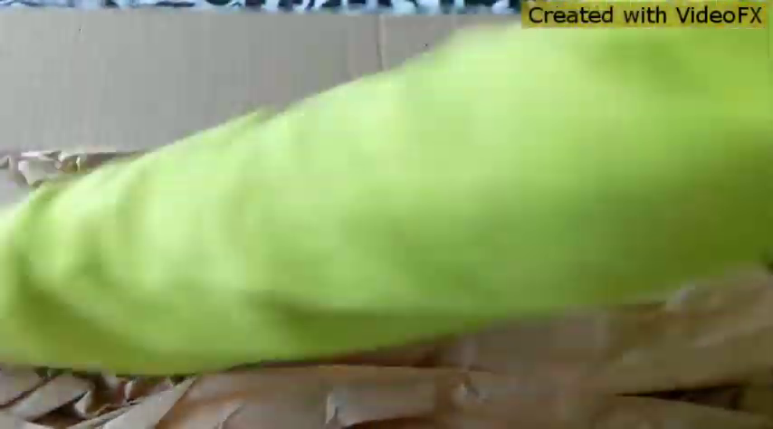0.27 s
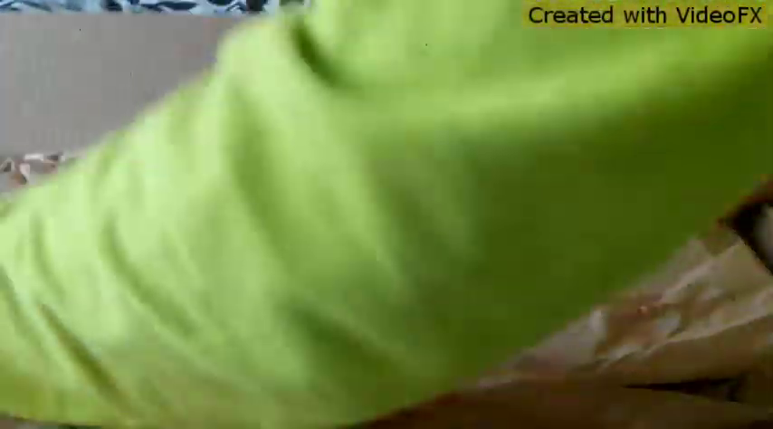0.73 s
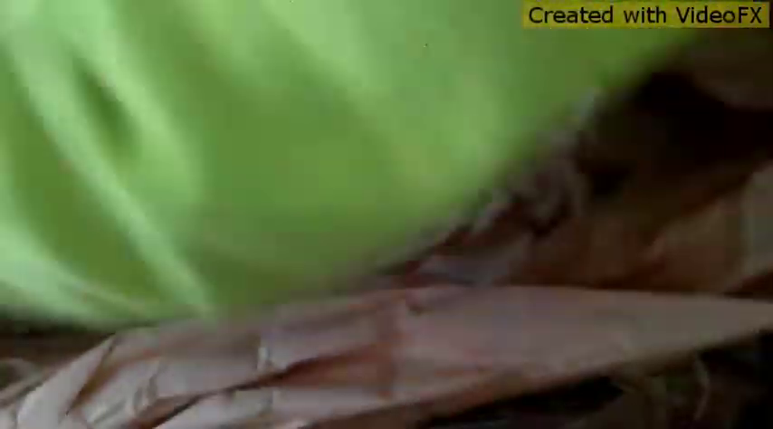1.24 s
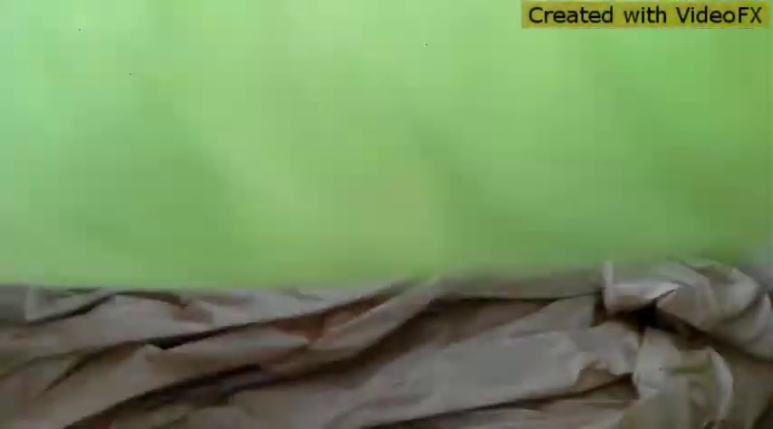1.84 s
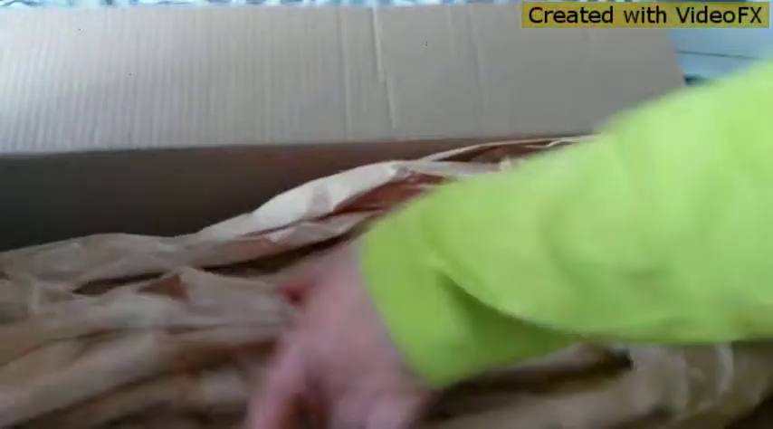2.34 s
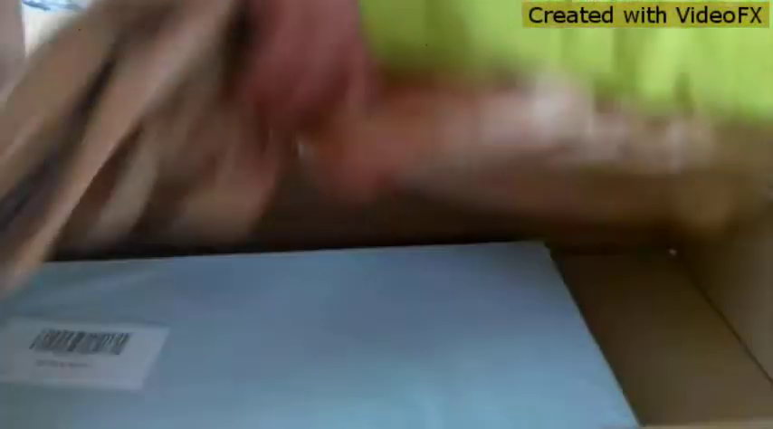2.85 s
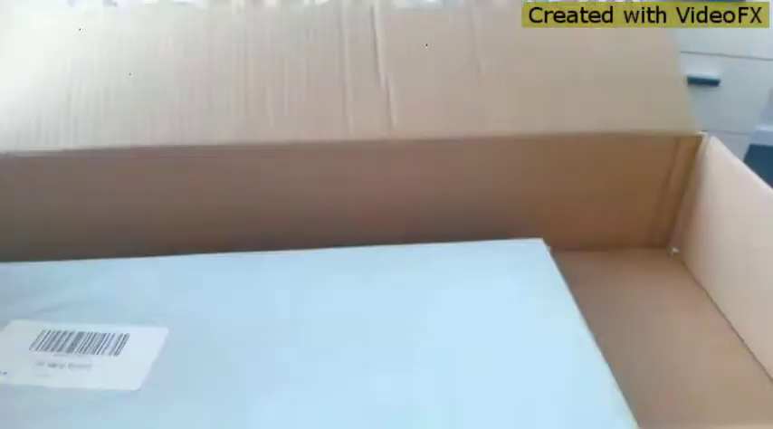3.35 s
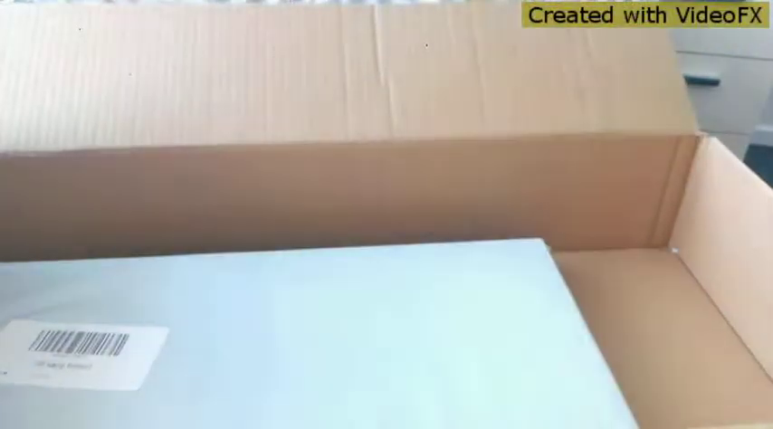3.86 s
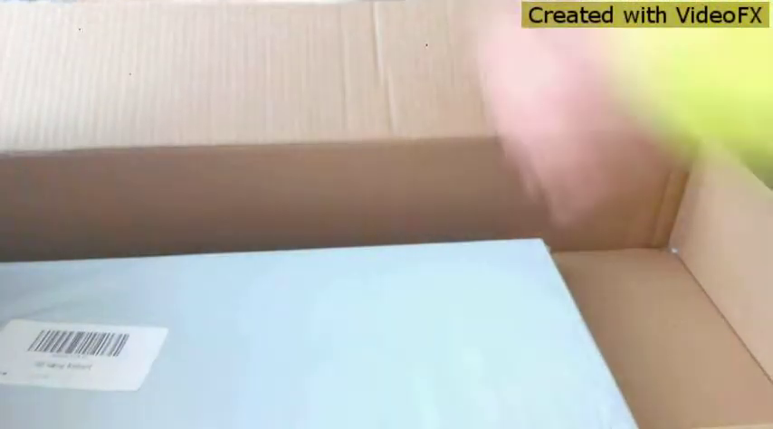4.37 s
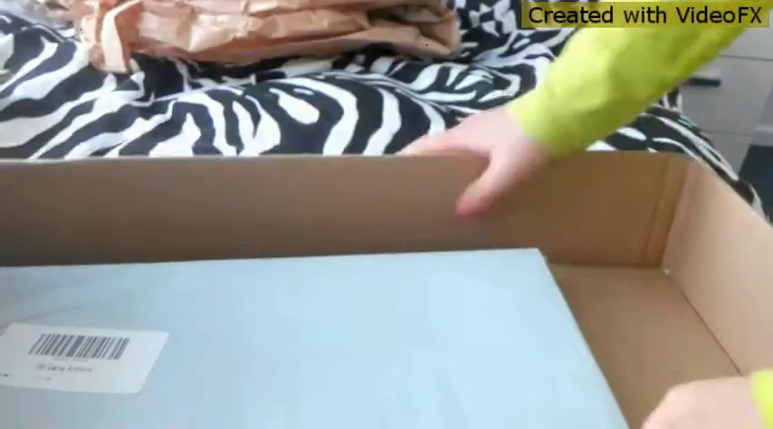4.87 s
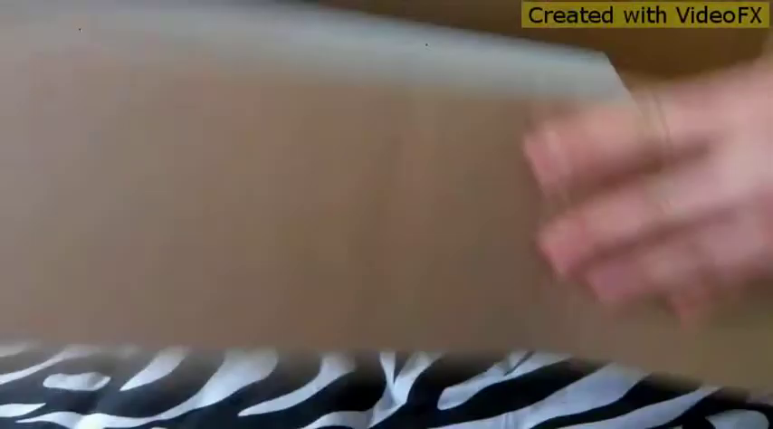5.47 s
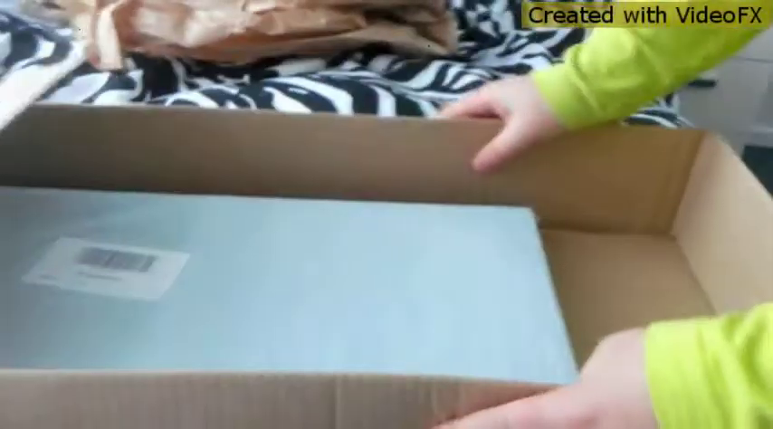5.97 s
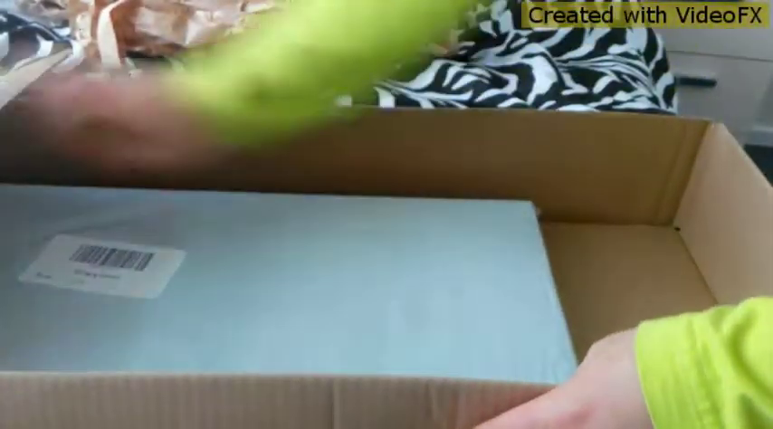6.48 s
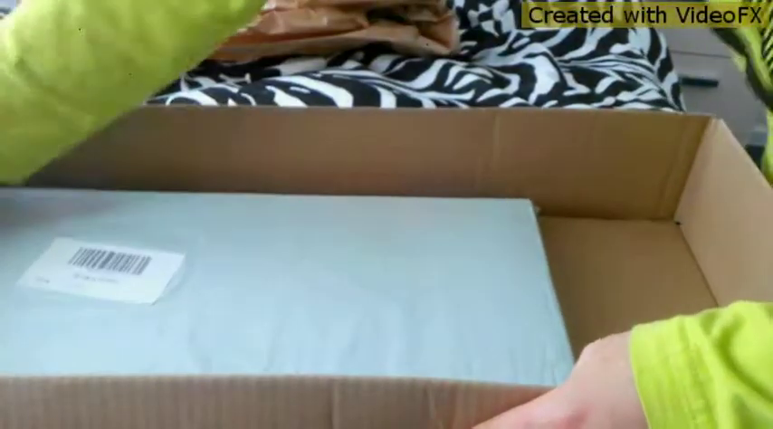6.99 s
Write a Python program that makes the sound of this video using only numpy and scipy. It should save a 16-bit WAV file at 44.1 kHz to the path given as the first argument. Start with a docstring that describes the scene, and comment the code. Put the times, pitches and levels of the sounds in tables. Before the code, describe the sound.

A close, slightly muffled perspective over an open cardboard box in a dry furnished room with a very faint floor of room tone. Gentle paper crinkles begin at once, with a low hollow bump and a snap near 0.55 s. From 0.85 to 2.2 s, stiff paper rustles in uneven strokes, with clusters of crisp snaps around 1.0-1.2 s and a soft thud at 2.25 s. The loudest crackling comes from 2.4 to 3.1 s, dense and bright, as the paper is pulled out. Softer crinkles and panel knocks follow to 3.6 s, a tiny squeak at 3.7, then light rustles and a short hoarse rub at 4.33. From 4.8 s the box is handled: dull knocks, faint ticks, brief scuffs and a small snap near 5.9. After quiet finger taps around 6.1, a hollow knock lands at 6.65, then a low rub and a final rustle with a bump near 7.2.

```python
"""A furnished room, a small microphone with a dull top just above an open cardboard box.
Crumpled kraft paper is gathered up and pulled out of the box, then put down close by.
Buckling creases are noise in half octaves driven by clumped clicks, over a hiss of sliding sheets; folds
snap as bursts of many decaying sines. Hands knock on the box, tip it and drag it: a swinging panel with
ringing modes, filtered noise for taps and ticks, gliding hoarse tones for rubs."""
import sys
import numpy as np
from scipy import signal
from scipy.fft import rfft, irfft, next_fast_len
from scipy.io import wavfile
from scipy.ndimage import uniform_filter1d

SR = 44100
rng = np.random.default_rng(int(sys.argv[2]) if len(sys.argv) > 2 else 0)


def wav_record(signal):
    """Record a signal, one row per channel, as 16-bit PCM in the file named by sys.argv[1]."""
    frames = np.transpose(np.atleast_2d(signal))
    bounded = np.clip(frames, -1, 1)
    # unit amplitude maps onto the largest positive 16-bit level
    quanta = np.round(bounded * 32767).astype(np.int16)
    wavfile.write(sys.argv[1], SR, quanta)


N = 318402
TIME = np.arange(N) / SR


def from_db(db):
    """Decibels to gain."""
    return 10 ** (np.asarray(db) / 20)


def rms_one(x):
    """Scale to rms 1."""
    return x / np.sqrt(np.mean(x ** 2) + 1e-20)


def drift(rate_hz):
    """Slow chance with spread 1: straight lines between random knots."""
    knots = rng.standard_normal(20000)
    return rms_one(np.interp(TIME * rate_hz, np.arange(len(knots)), knots))


def coloured(x, points):
    """Causal (minimum-phase) filter with a spectrum of (pitch_hz, level_db) points."""
    size = 2 * next_fast_len(N // 2 + SR // 2)
    half = size // 2
    hz, db = np.transpose(points)
    grid_hz = np.maximum(np.arange(half + 1) * SR / size, 1)
    gain = from_db(np.interp(np.log(grid_hz), np.log(hz), db))
    # folding the cepstrum onto positive times makes the filter minimum-phase
    cepstrum = irfft(np.log(gain))
    cepstrum[1:half] *= 2
    cepstrum[half + 1:] = 0
    response = np.exp(rfft(cepstrum))
    return irfft(rfft(x, size) * response)[:N]


def resonance(x, hz, width_hz):
    """Two-pole band-pass with gain 1 on top."""
    r = np.exp(-np.pi * width_hz / SR)
    zeros = np.array([1, 0, -1]) * (1 - r * r) / 2
    poles = [1, -2 * r * np.cos(2 * np.pi * hz / SR), r * r]
    return signal.lfilter(zeros, poles, x + 1e-18)


def fading(clicks, seconds):
    """Every click jumps up and dies away exponentially."""
    return signal.lfilter([1], [1, -np.exp(-1 / (seconds * SR))], clicks + 1e-18)


def add(out, s, sound):
    """Mix a sound in from time s."""
    start = max(round(s * SR), 0)
    out[start:start + len(sound)] += sound[:N - start]


def half_octaves():
    """Centre and band-pass of each half octave."""
    edges_hz = np.geomspace(62, 16000, 17)
    for low, high in zip(edges_hz, edges_hz[1:]):
        yield np.sqrt(low * high), signal.butter(2, [low, high], "band", fs=SR, output="sos")


def blend(hz, centres_hz, levels):
    """Level at a pitch, interpolated between register levels over log frequency."""
    weights = [np.interp(np.log(hz), np.log(centres_hz), w) for w in np.eye(len(levels))]
    return sum(w * level for w, level in zip(weights, levels))


# pushes and pulls of the hands on paper and box: start_s, swell_s, hold_s, level_db (700-2500 Hz);
# against that level: body_db (150-700 Hz), crisp_db (2500-7500 Hz), sizzle_db (above 11 kHz)
HAND_STROKES = [(-0.01, 0.03, 0.021, -51, -8.5, -8, -27), (0.044, 0.053, 0.006, -51, -10.5, -3.5, -37),
                (0.162, 0.047, 0.12, -75.5, 1, -3, -35), (0.432, 0.012, 0.045, -55, -8, -3, -41),
                (0.517, 0.012, 0.0066, -47.5, -9, -5.5, -26), (0.837, 0.025, 0.03, -53, -8, -7, -36),
                (0.886, 0.017, 0.035, -64, -8.5, 2.5, -40), (0.95, 0.083, 0.058, -43, -5, -2, -29),
                (1.103, 0.058, 0.13, -44.5, -9.5, -2, -29), (1.34, 0.034, 0.012, -53.5, 1, -2, -42),
                (1.426, 0.054, 0.065, -63, 1.5, -7, -36), (1.515, 0.0033, 0.015, -51.5, -5, -8.5, -47),
                (1.575, 0.11, 0.026, -45.5, -9.5, -2, -37), (1.712, 0.044, 0.078, -47, -8.5, -3, -36),
                (1.834, 0.071, 0.085, -49.5, -8.5, -2, -29.5), (2.003, 0.075, 0.091, -47.5, -13, -5, -42),
                (2.235, 0.032, 0.1, -59, 2.5, -2, -28), (2.421, 0.086, 0.018, -42.5, -7.5, -0.5, -27),
                (2.589, 0.017, 0.011, -40, -4, -4.5, -32), (2.644, 0.0081, 0.16, -41.5, -9.5, -2, -25),
                (2.82, 0.068, 0.097, -44, -5, 0.5, -28), (3.021, 0.035, 0.008, -40, -8.5, 0.5, -18),
                (3.084, 0.028, 0.21, -47.5, -13, 0, -32), (3.323, 0.051, 0.0077, -43, -18, -14, -57),
                (3.376, 0.065, 0.086, -47, -7, 0.5, -27.5), (3.562, 0.064, 0.11, -52, -13, -7, -55),
                (3.77, 0.026, 0.19, -63, -7, -7, -45), (3.958, 0.074, 0.092, -55.5, -14.5, 0, -33),
                (4.113, 0.046, 0.087, -57.5, -9.5, -3, -45), (4.256, 0.08, 0.037, -50, -20, -5, -39),
                (4.402, 0.031, 0.05, -51, 0, -7, -47), (4.461, 0.029, 0.11, -53.5, -11.5, -1.5, -38),
                (4.62, 0.047, 0.57, -75, 0.5, -4, -31), (4.94, 0.01, 0.032, -64, 5.5, -28, -40),
                (5.143, 0.005, 0.18, -58.5, -8, -11, -32), (5.255, 0.052, 0.058, -50.5, -8, -7.5, -25.5),
                (5.408, 0.032, 0.009, -52.5, -3, -8, -32), (5.488, 0.038, 0.008, -57, -19, -3, -35),
                (5.572, 0.013, 0.246, -76, 0.5, -5, -32), (5.776, 0.033, 0.044, -58, 4.5, -13, -34),
                (5.837, 0.034, 0.004, -43, -1.5, -9.5, -39), (5.996, 0.019, 0.72, -81.5, 6, -6, -29.5),
                (6.77, 0.055, 0.01, -73, 4.5, -7.5, -34), (6.977, 0.011, 0.023, -63, 14.5, -20, -37.5),
                (7.026, 0.034, 0.057, -59.5, 2, -14.5, -44), (7.138, 0.087, 0.04, -47, 1, -5.5, -28)]
# brief swells of thin, high paper hiss: centre_s, level_db (above 11 kHz)
HISS_SWELLS = [(.035, -63), (1.26, -70), (2.15, -79), (4.72, -74)]
HISS_S = 0.011  # from the centre until the level has dropped to 1/e
# fall once the hand lets go, the highs fastest: body, middle, crisp, sizzle [dB per s]
RELEASE_DB_PER_S = (184, 228, 248, 424)
SETTLE_DB, SETTLE_DB_PER_S = -32.5, 111  # faint settling afterwards
FIRM_DB = -45.5  # level of a firm stroke
FIRM_SLIDING, SLIDING_PER_DB = 0.35, 0.012  # its share of smooth sliding; gentler ones buckle less


def handling():
    """Strokes swell, hold and die away; gives four register levels in dB and the sliding share."""
    power = np.full((4, N), 1e-13)
    for start, swell_s, hold_s, db, body_db, crisp_db, sizzle_db in HAND_STROKES:
        t = TIME[:SR] - min(start, 0)
        swell = np.clip(t / max(swell_s, 1e-3), 0, 1)
        after_s = np.maximum(t - swell_s - hold_s, 0)
        settle = from_db(SETTLE_DB - SETTLE_DB_PER_S * after_s)
        colours_db = (body_db, 0, crisp_db, sizzle_db)
        for register, colour_db, fall in zip(power, colours_db, RELEASE_DB_PER_S):
            release = np.hypot(from_db(-fall * after_s), settle)
            add(register, start, (from_db(db + colour_db) * swell * release) ** 2)
    for s, db in HISS_SWELLS:
        swell = np.exp(-np.minimum(((TIME - s) / HISS_S) ** 2, 20))
        power[3] += (from_db(db) * swell) ** 2
    body, middle, crisp, sizzle = 10 * np.log10(power)
    smooth = np.clip(FIRM_SLIDING + SLIDING_PER_DB * (FIRM_DB - middle), 0, 1)
    return body, middle, crisp, sizzle, smooth


def rustle(clicks_per_s=380, size_db=2.5, facet_db_per_octave=2.5, clump_db=2.5, patchy_db=2.0,
           crease_s=0.0007, cycles=0.22, tail_share=0.048, tail_s=0.0075):
    """Creases buckle in clumps, each with a size and colour of its own, over the hiss of sheets sliding."""
    body, middle, crisp, sizzle, smooth = handling()
    chance = clicks_per_s * from_db(clump_db * drift(45)) / SR
    at = np.flatnonzero(rng.random(N) < chance)
    sizes_db = size_db * np.minimum(rng.exponential(1, len(at)), 5)
    facet_octave = rng.uniform(np.log2(500), np.log2(9000), len(at))
    # power per Hz in each register, before the microphone dulls the top
    registers_db = [body + 17.64, middle + 12.4, crisp + 8.28, crisp + 4.58, sizzle + 28.0]
    out = np.zeros(N)
    for hz, band in half_octaves():
        # each facet is loudest around a pitch of its own
        off_octaves = np.minimum(np.abs(np.log2(hz) - facet_octave), 2)
        uneven_db = 1.6 * rng.standard_normal(len(at))
        clicks = np.zeros(N)
        clicks[at] = from_db(sizes_db - facet_db_per_octave * off_octaves + uneven_db) ** 2
        # low pitches ring longer, and each crack lingers in the folds
        power = fading(clicks, crease_s + cycles / hz) + tail_share * fading(clicks, tail_s)
        # levelled over 50 ms, so that the strokes set the loudness
        power /= np.maximum(uniform_filter1d(power, size=2200), 1e-9)
        level_db = blend(hz, [380, 1400, 3500, 6500, 11000], registers_db) + patchy_db * drift(30)
        grain = np.sqrt(smooth + (1 - smooth) * power)
        out += signal.sosfilt(band, from_db(level_db) * grain * rng.standard_normal(N))
    return out


# single snaps of creases and edges, loud and faint: start_s, peak_db;
# against the part around 1800 Hz, plus a shared level: low_db (450 Hz), top_db (5600 Hz and up)
FOLD_SNAPS = [(0.0158, -37, -2, -25), (0.03, -38, -10, -13), (0.0813, -35, -21, 3), (0.0971, -35, -27, 2),
              (.128, -48.5, -14, 4), (.343, -54, -26, -22), (.5399, -28, -22, -2),
              (0.8513, -35.5, -20, -38), (1.0178, -35, 4, -12), (1.0222, -21, -5, -5),
              (1.0886, -20.5, -24, 8), (1.0928, -21.5, -7, -9), (1.1814, -31, -1, -11),
              (1.2136, -21, -11, -5), (1.133, -32, -12, -3.5), (1.371, -32.5, -12, -16),
              (1.518, -35, -8, -32), (1.6717, -21, -23, 2), (2.0722, -30, -29, -14), (2.1551, -26, -16, -7),
              (2.4466, -32, -14.5, -3.5), (2.468, -22, -26, -3), (2.4864, -26, -31, -15),
              (2.5048, -15, -3, 17), (2.601, -20.5, -4.5, 19), (2.6547, -19.5, -26, 9.5),
              (2.6768, -18.5, -18, -3), (2.696, -28, -2, -27), (2.709, -29, -8, -12), (2.726, -21, -9, 25),
              (2.7332, -19, 0.5, 23), (2.7617, -13, -1, 29), (2.7962, -32, -20.5, -4),
              (3.0669, -20.5, -17, -10.5), (3.1618, -42, -24, 4), (3.5125, -25.5, 6, -3),
              (3.7058, -38, -16, -12), (4.118, -41, -23, 1), (4.3349, -30.5, -34, -37),
              (4.4278, -32, -5, -5), (5.1535, -37, -2, -37), (5.285, -35.5, 2.5, -33),
              (5.448, -39, -16, -34), (5.5821, -42.5, -7, -11), (5.801, -41.5, -10, -22),
              (5.8777, -26, -5, -12), (6.217, -47, 8, -8), (6.989, -48.5, 7, -25), (7.074, -51, 12, -27),
              (7.187, -30, -2, -28)]


def snaps(low_db=-3.0, top_db=4.0, air_db=2.5, snap_s=0.0011, cycles=2.0):
    """A stiff fold flips over: its facet rings for a few milliseconds at many unrelated pitches."""
    out, t = np.zeros(N), TIME[:SR // 25]
    for s, peak_db, low, top in FOLD_SNAPS:
        hz = np.geomspace(200, 15000, num=48) * np.exp(rng.normal(0, 0.04, 48))
        parts_db = [low + low_db, 0, top + top_db, top + air_db]
        colour_db = blend(hz, [450, 1800, 5600, 12000], parts_db)
        hz = hz[:, None]
        dying = np.exp(-t / (snap_s + cycles / hz)) * (1 - np.exp(-t / 0.0001))
        tones = np.sin(2 * np.pi * (hz * t + rng.random((len(hz), 1))))
        snap = from_db(colour_db) @ (dying * tones)
        add(out, s, from_db(peak_db) * snap / np.abs(snap).max())
    return out


# stick-slip rubs on the cardboard: start_s, length_s, first_pitch_hz, last_pitch_hz, level_db
CARDBOARD_RUBS = [(0.163, 0.2, 1677, 1620, -62.5), (.154, .22, 4380, 4120, -71),
                  (3.721, 0.049, 2850, 3290, -55.5), (3.729, .04, 3500, 3730, -60),
                  (3.734, 0.054, 4080, 4120, -59), (4.332, 0.041, 1854, 1628, -46),
                  (6.99, 0.34, 672.5, 651, -56)]


def rubs(judder_db=3.5, wander_hz=115):
    """Sliding contact judders and sings hoarsely on a gliding, unsteady pitch."""
    out = np.zeros(N)
    for s, length_s, first_hz, last_hz, db in CARDBOARD_RUBS:
        progress = np.clip((TIME - s) / length_s, 0, 1)
        hz = first_hz + (last_hz - first_hz) * progress + wander_hz * drift(900)
        judder = from_db(judder_db * drift(400))
        tone = rms_one(judder * np.sin(2 * np.pi * np.cumsum(hz) / SR))
        # silent before and after, fullest midway
        arch = np.sqrt(np.abs(np.sin(np.pi * progress)))
        out += from_db(db) * arch * tone
    return out


# knocks on the cardboard: time_s, level_db, panel_pitch_hz,
# ring_db (the box against the panel) and hardness_db, each plus a shared level
PANEL_KNOCKS = [(0.547, -23.5, 202, -14, -39), (.571, -34, 197, -12.5, -10), (1.014, -34, 302, -10, -2),
                (1.181, -41, 145, -6.5, 4), (1.365, -44, 203, -12, -8), (1.51, -43.5, 476, -18.5, 2),
                (2.243, -27, 260, -9.5, -32), (2.258, -41, 283, -13, -14), (2.615, -39, 277, -22, -4),
                (2.99, -36.5, 294, -9, -7), (3.065, -29, 210, -11, -6), (3.403, -34, 420, -4, -13),
                (3.451, -37.5, 410, -13, -9), (3.524, -26.5, 236, -14, -9), (4.436, -34.5, 288, -14.5, -4),
                (4.821, -31, 265, -11, -41), (4.84, -34, 282, -13, -44), (4.922, -45, 186, -13, -20),
                (5.149, -38.5, 202, -6, -9), (5.277, -35.5, 238, -6.5, -7), (5.402, -39, 152, -10, -3),
                (5.437, -37, 211, -15, -10), (5.743, -55, 180, -4, -11), (5.874, -37.5, 203, -7.5, -1),
                (6.653, -25, 242, -6, -13), (7.044, -41.5, 169, -16, -3.5), (7.184, -34.5, 462, -6, -3)]
# modes of the box: pitch_hz, level_db, t60_s
BOX_MODES = [(88, -5.5, 0.13), (134.3, 6.5, 0.12), (207.8, -3.5, 0.25), (251, -5.5, 0.2),
             (299.4, 0.5, 0.23), (362, -23.5, 0.076), (443, -2.5, 0.12), (532, -6, 0.19), (630, -13, 0.21),
             (834, -13, 0.13), (932, -7.5, 0.18), (993, -8.5, 0.023), (1380, -13, 0.075)]


def knocks(swell_s=0.0031, delay_s=0.00442, ring_db=-0.5, hardness_db=8.5, detune=0.04,
           scuff_db=-16.5, scuff_t60_s=0.063):
    """The struck panel swings for a few cycles; the box rings on, its upper modes after hard blows."""
    out, t = np.zeros(N), TIME[:SR // 3]
    dull = signal.butter(3, [250, 1300], "band", fs=SR, output="sos")
    for s, level_db, hz, ring, hardness in PANEL_KNOCKS:
        swing = t / swell_s * np.exp(1 - t / swell_s) * np.sin(2 * np.pi * hz * t)
        hard_db = min(hardness + hardness_db, 0)
        # the flutes inside the board crunch under a hard blow
        crunch = rms_one(signal.sosfilt(dull, rng.standard_normal(len(t))))
        box = from_db(scuff_db + hard_db - 60 * t / scuff_t60_s) * crunch
        for mode_hz, db, t60_s in BOX_MODES:
            reach_db = np.interp(mode_hz, [350, 750], [0, hard_db])
            # each mode is a pair of tones, detuned at random for each knock
            pair_hz = mode_hz * rng.normal(1, detune, (2, 1))
            pair = np.sin(2 * np.pi * (pair_hz * t + rng.random((2, 1))))
            box += from_db(db + reach_db - 60 * t / t60_s) * pair.sum(0) / np.sqrt(2)
        ringing = from_db(ring + ring_db) * box * (1 - np.exp(-t / swell_s))
        # each knock sounds a few milliseconds after its listed time
        add(out, s + delay_s, from_db(level_db) * (swing + ringing))
    return out


# fingertips tapping the flaps: start_s, peak_db (plus a shared level), pitch_hz
FLAP_TAPS = [(1.517, -43, 1270), (3.804, -40, 590), (3.822, -40.5, 573), (4.96, -47, 710),
             (6.057, -41.5, 732), (6.129, -54.5, 720), (6.215, -53, 745), (6.657, -37.5, 940),
             (6.991, -38, 616), (7.072, -35, 640)]


def taps(t60_s=0.094, width_hz=220, level_db=-1.0):
    """A fingertip sets a small patch of flap buzzing briefly: dying noise through two resonances."""
    out, t = np.zeros(N), TIME[:SR // 6]
    for s, peak_db, hz in FLAP_TAPS:
        touch = rng.standard_normal(len(t)) * from_db(-60 * t / t60_s)
        tap = resonance(resonance(touch, hz, width_hz), hz, 400)
        add(out, s, from_db(peak_db + level_db) * tap / np.abs(tap).max())
    return out


# while the box is held: from_s, to_s
BOX_HELD_S = (4.8, 6.4)


def ticks(count=22, loudest_db=-56.0, spread_db=5.0, low_hz=900, high_hz=5200, die_s=0.0019):
    """The flexed cardboard gives faint ticks at random while the box is held."""
    out, t = np.zeros(N), TIME[:SR // 50]
    band = signal.butter(1, [low_hz, high_hz], "band", fs=SR, output="sos")
    held_from, held_to = BOX_HELD_S
    for place, faintness in rng.random((count, 2)):
        tick = signal.sosfilt(band, rng.standard_normal(len(t)) * np.exp(-t / die_s))
        gain = from_db(loudest_db - spread_db * faintness)
        add(out, held_from + place * (held_to - held_from), gain * tick / np.abs(tick).max())
    return out


def room(x, t60_s=0.083, tail_db=-17):
    """The short, faint tail of a furnished room: dying noise that starts after 3 ms."""
    t = TIME[:SR // 3]
    tail = rng.standard_normal(len(t)) * from_db(-60 * t / t60_s) * (t > 0.003)
    return x + from_db(tail_db) * signal.fftconvolve(x, tail / np.linalg.norm(tail))[:N]


def scene():
    """Paper and box in the room; knocks and ticks reach the microphone without the tail."""
    return (room(rustle() + snaps() + rubs() + taps()) + knocks() + ticks())[None]


# the microphone's peaks and dips: pitch_hz, width_hz, level_db
MICROPHONE_PEAKS = [(1780, 740, 2.5), (2420, 940, -6.5), (3300, 1800, 2.5), (4515, 780, -7.5),
                    (5420, 580, -8), (6980, 580, -7.5)]
# its overall response, with a steep loss of treble: pitch_hz, level_db
MICROPHONE_RESPONSE = [(30, -7.5), (80, -16), (170, -5), (7200, -1), (7800, -17.5), (8600, -28),
                       (11000, -32), (12000, -27.5), (13200, -16), (15800, -26)]
# colour of the still room: pitch_hz, level_db (relative power per Hz)
STILL_ROOM = [(15, -32), (25, -5.5), (274, 0), (804, -1.5), (919, -10), (1710, -7), (2170, -14.5),
              (3630, -9), (5430, -20), (8130, -23.5), (15500, -21.5)]
ROOM_TONE_DB, CUTOFF_HZ = -85, 15850


def record(dry):
    """The microphone colours the sound, a faint floor of still room joins it, and the top is cut."""
    x = dry[0]
    for hz, width_hz, db in MICROPHONE_PEAKS:
        x = x + (from_db(db) - 1) * resonance(x, hz, width_hz)
    floor = rms_one(coloured(rng.standard_normal(N), STILL_ROOM))
    x = coloured(x, MICROPHONE_RESPONSE) + from_db(ROOM_TONE_DB) * floor
    top_cut = signal.ellip(10, 0.1, 70, CUTOFF_HZ, fs=SR, output="sos")
    return signal.sosfilt(top_cut, x)[None]


dry = scene()
out = record(dry)
wav_record(out)
```